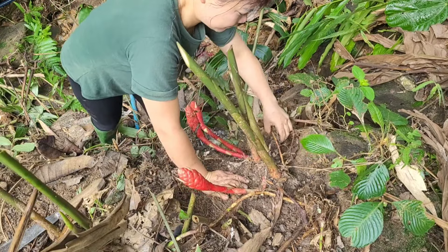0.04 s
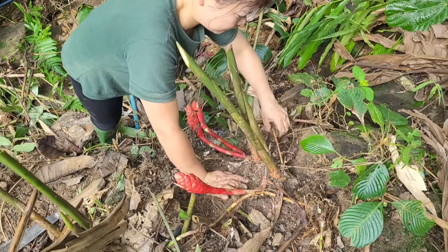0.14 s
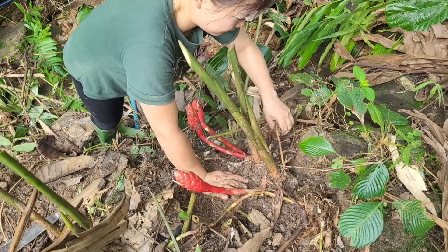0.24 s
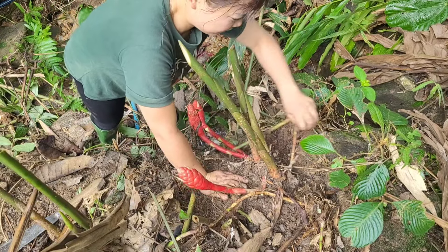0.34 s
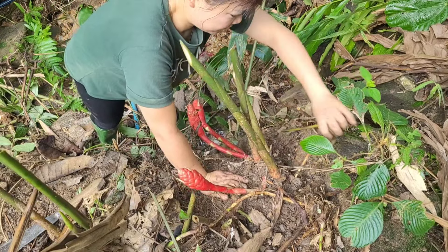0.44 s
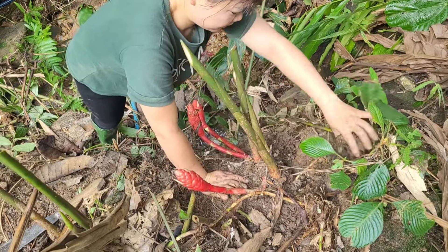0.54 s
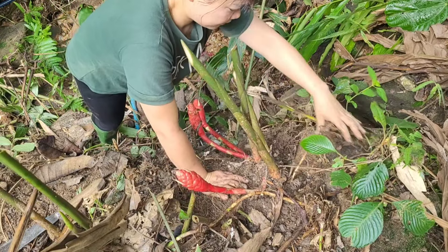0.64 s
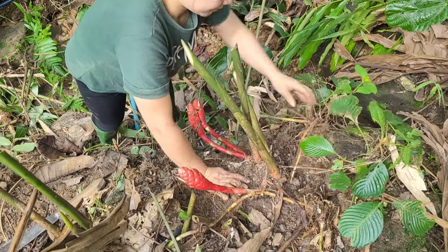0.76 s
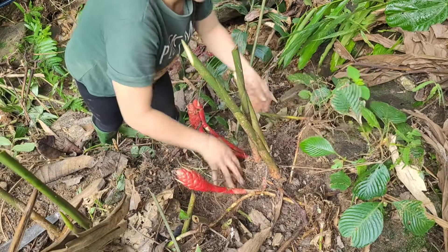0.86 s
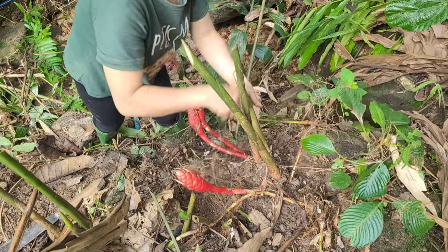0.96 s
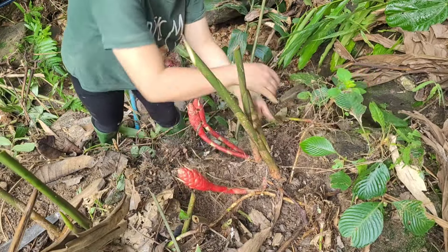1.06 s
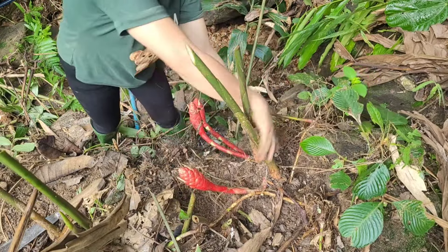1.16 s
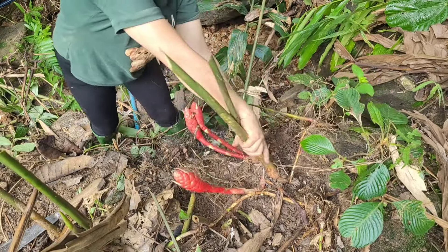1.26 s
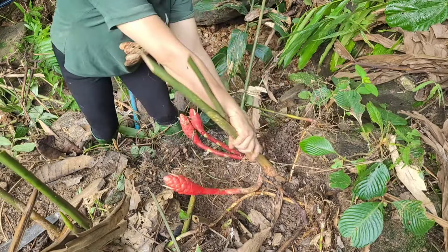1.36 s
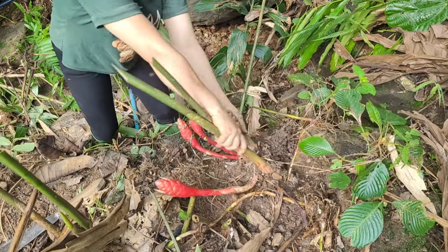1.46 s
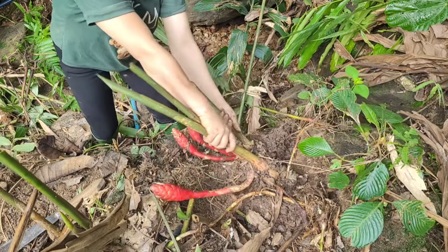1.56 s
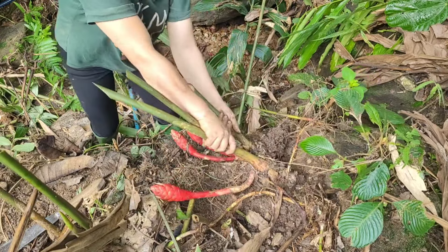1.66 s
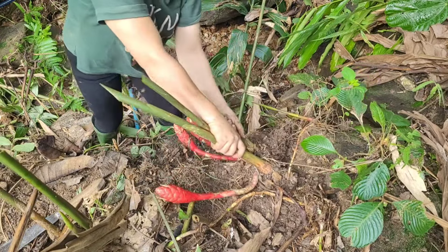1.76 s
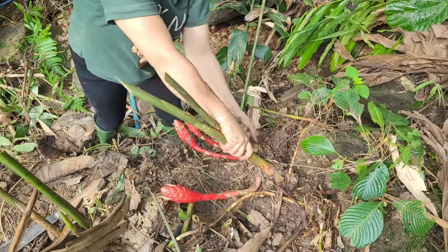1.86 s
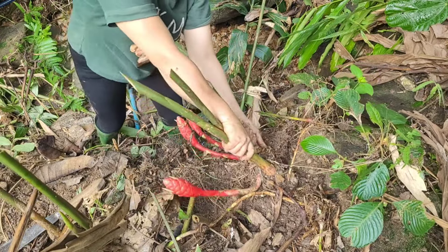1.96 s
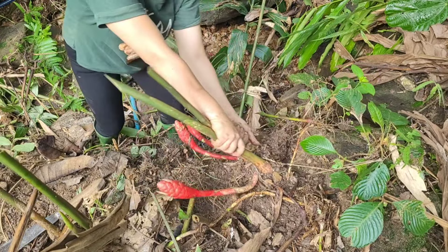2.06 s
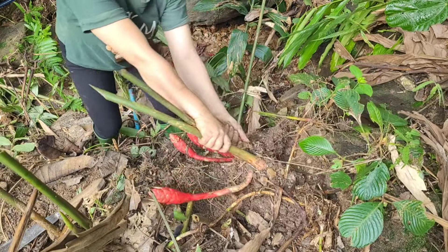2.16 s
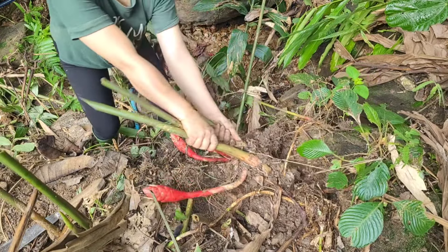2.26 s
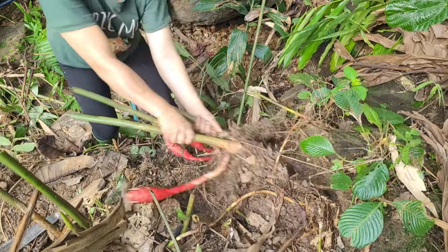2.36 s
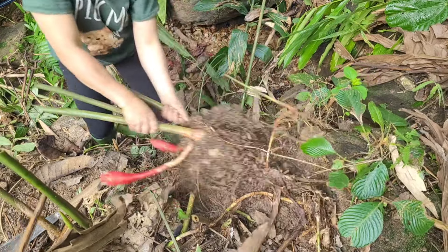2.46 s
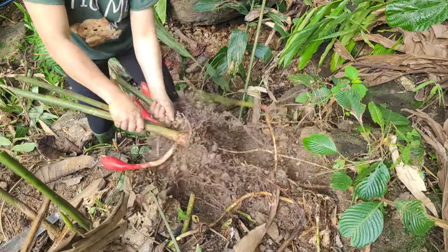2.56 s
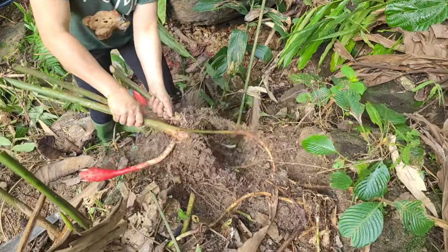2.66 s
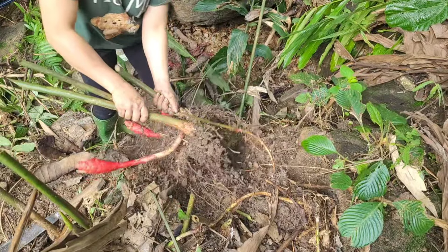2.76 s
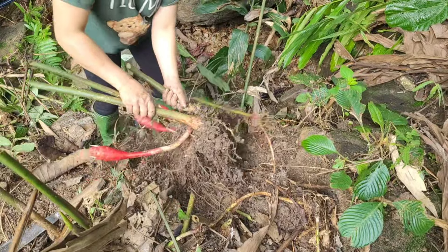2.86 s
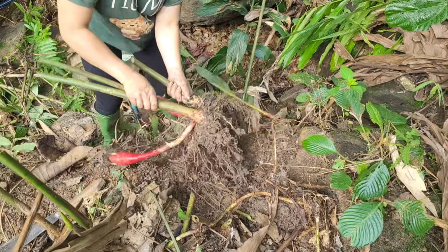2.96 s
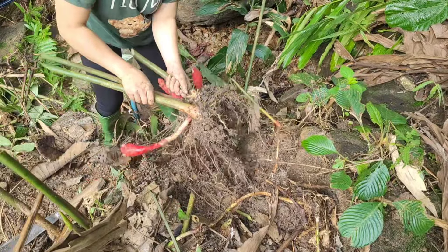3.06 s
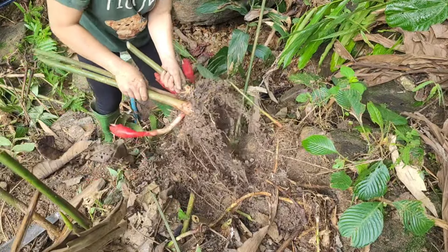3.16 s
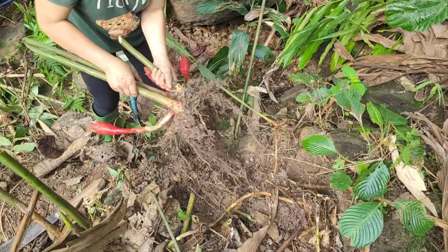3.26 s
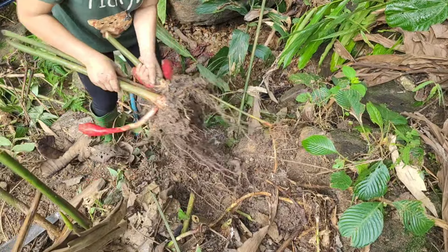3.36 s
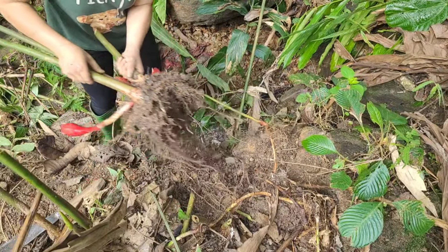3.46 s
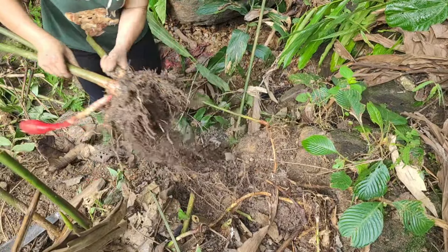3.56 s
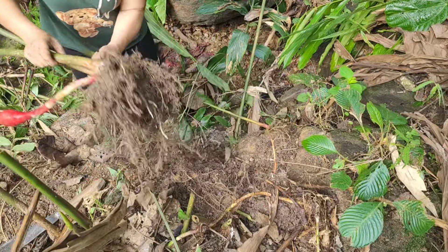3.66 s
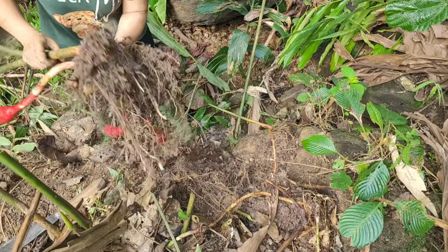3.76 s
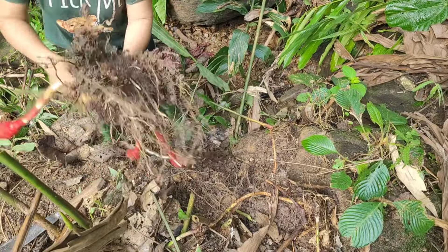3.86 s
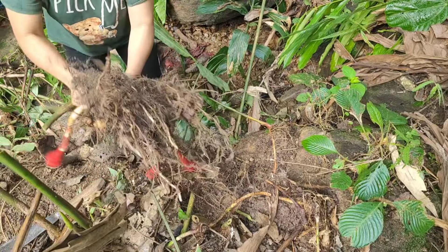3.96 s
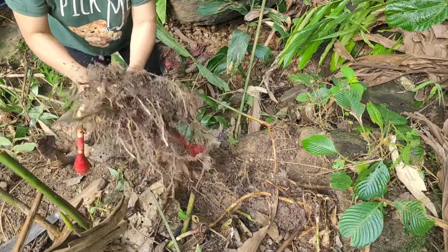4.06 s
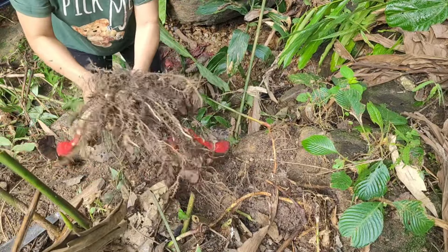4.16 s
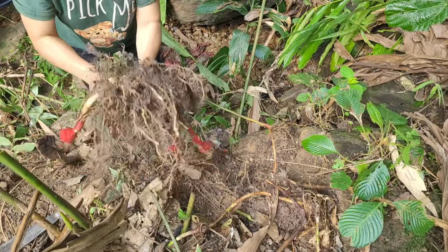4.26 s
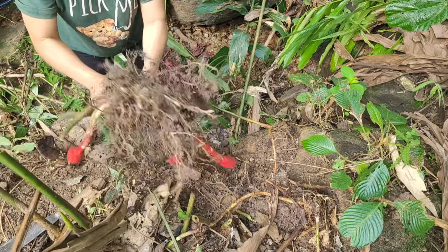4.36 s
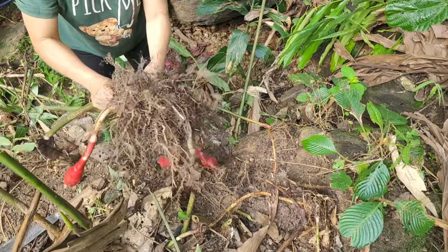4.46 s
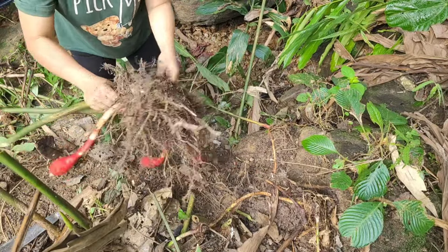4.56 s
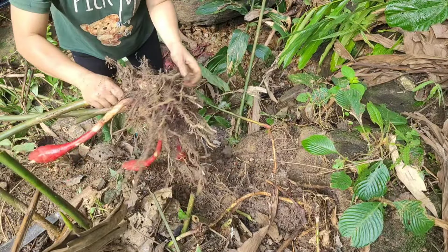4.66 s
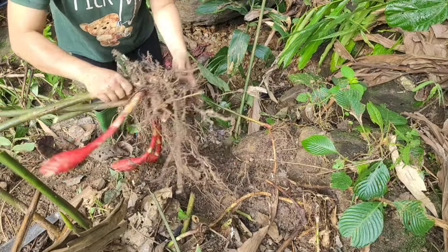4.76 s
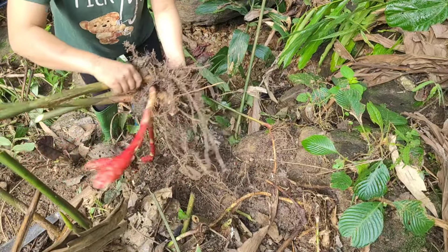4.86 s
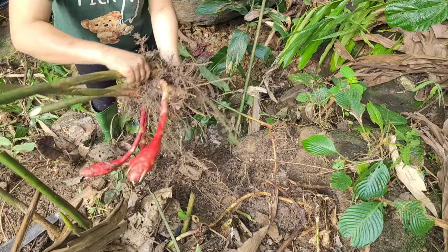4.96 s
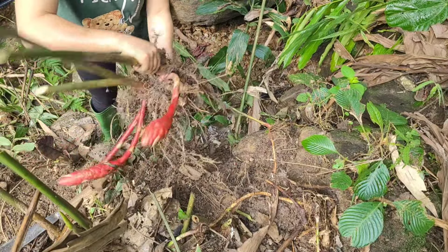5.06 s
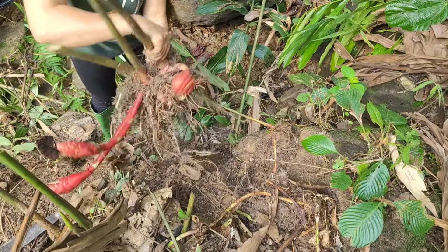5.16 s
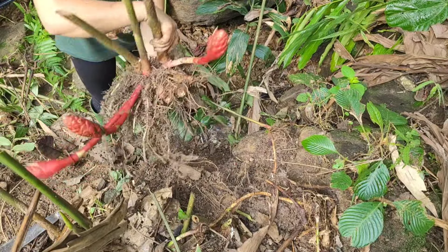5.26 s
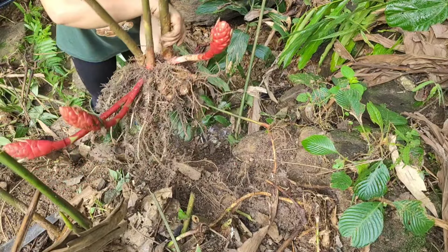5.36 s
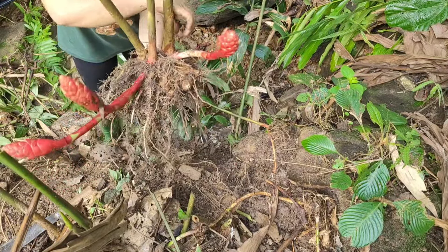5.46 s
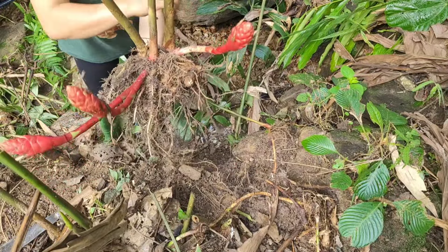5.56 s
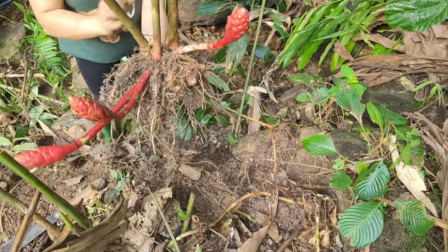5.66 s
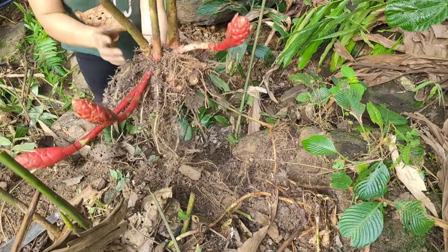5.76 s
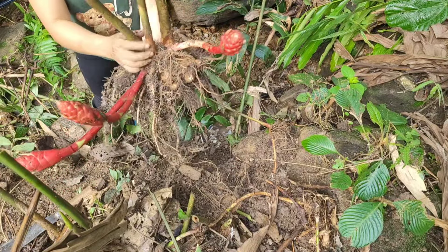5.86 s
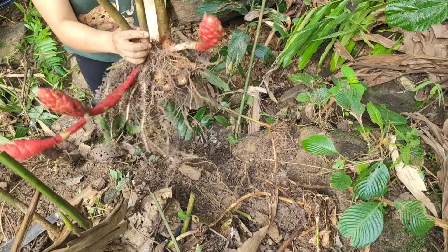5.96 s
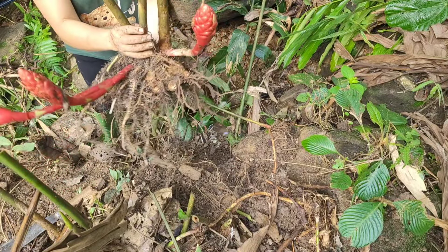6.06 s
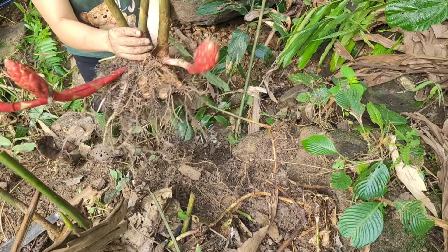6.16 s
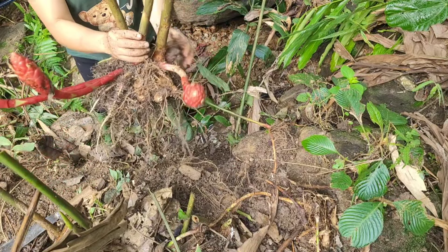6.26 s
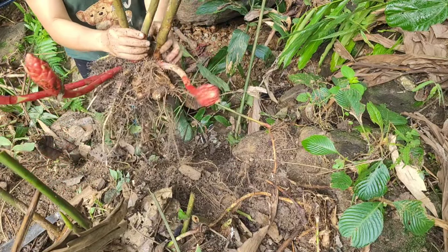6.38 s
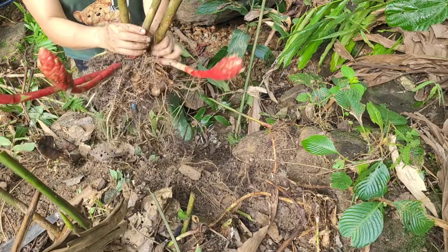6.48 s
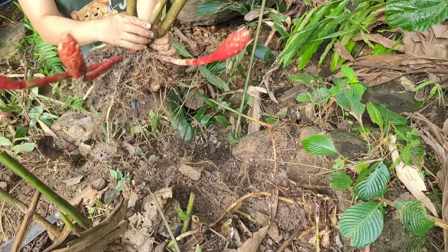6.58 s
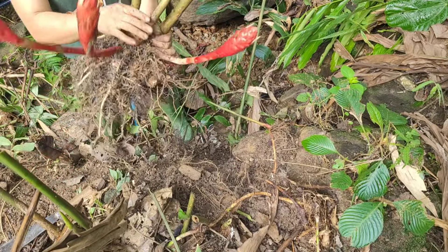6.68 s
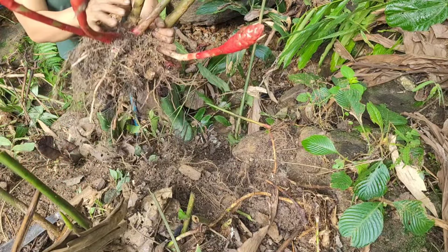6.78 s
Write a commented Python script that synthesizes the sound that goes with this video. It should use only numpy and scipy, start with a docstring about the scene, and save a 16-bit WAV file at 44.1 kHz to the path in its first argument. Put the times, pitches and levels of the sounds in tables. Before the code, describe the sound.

Leaf litter rustles under a searching hand, with dull little pops from the soil. After a quieter strained pull come a flurry of root cracks, a short woody creak and the loudest rush of tearing earth. Clods thud, crumbs tap leaves and grit hisses as the clump is shaken and turned, then only light dribbling remains. Near, dry outdoor sound, thin insect hiss all round.

```python
"""A hand scuffs through leaf litter over a thin insect hiss, then a clump of fleshy plants is pulled up.
Soil is a flow of random grains: clods thud, crumbs tap dry leaves and grit hisses as it is torn and shaken out.
Roots pop as muffled swings underground or snap as swept pulses through two bending modes; stems creak as
stick-slip tones. Rustling crunches and stray crumbs fill in, the forest scatters a dull tail, and filtered
noise from all round makes the insects and foliage."""
import sys
import numpy as np
from scipy import signal
from scipy.fft import rfft, irfft
from scipy.io import wavfile
from scipy.ndimage import uniform_filter1d

SR = 44100
rng = np.random.default_rng(int(sys.argv[2]) if len(sys.argv) > 2 else 0)


def dump(signal):
    """Clip the signal to [-1, 1] and save it as 16-bit WAV at the path in sys.argv[1]."""
    limited = np.clip(np.atleast_2d(signal).T, -1, 1)
    pcm = np.round(limited * 32767).astype(np.int16)
    wavfile.write(sys.argv[1], SR, pcm)


N = 300762
TIME = np.arange(N) / SR

# Levels are at the source, before panning, scattering and colouring.
# Each disturbance sets soil running; it builds (over 2 ms or more), holds and trickles out. In order:
# a hand sweeps the litter, is drawn back, gropes for a grip; soil sifts under the steady pull, the ground
# starts to lift, roots part, the root ball tears out, its soil lands; it is lifted clear, shaken,
# turned over, held up still dribbling, and tilted again.
# [t/s, level/dB, rise/s, hold/s, fade time constant/s, clods relative to crumbs level/dB]
SOIL_POURS = [(0, -53, 0.0016, .11, 0.1, -2.5), (0.186, -57, 0.013, 0.08, 0.5, -13.5),
              (0.54, -63, 0.18, 0.64, 0.38, -3), (1.61, -69, 0.013, 0.95, .2, -9),
              (2.187, -60, 0.067, 0.024, 0.16, -0.5), (2.383, -52.5, 0.0083, 0.037, 0.36, -6.5),
              (2.69, -45, 0.089, 0.096, 0.18, -7), (2.919, -41.5, 0.015, 0.036, 0.2, -4),
              (3.149, -51.5, 0.028, 0.23, 1, -7), (4.155, -51, 0.26, 0.15, 0.74, -8.5),
              (5.13, -60, 0.1, 0.13, .02, -3), (5.396, -66.5, 0.053, 0.29, 0.29, -14),
              (6.404, -59.5, 0.33, .1, 0.4, -14)]
# roots snapping in the open: [t/s, stump level/dB, stump f/Hz, crack level/dB, crack f/Hz,
# top of the crack f/Hz, splinter tail level/dB]
ROOT_SNAPS = [(1.6444, -35, 745, -24.5, 4760, 6050, -31), (1.6528, -28.5, 800, -38, 1610, 6900, -47),
              (2.371, -21, 560, -24.5, 1560, 4540, -32), (2.4006, -20.5, 318, -26.5, 1700, 8000, -34.5),
              (2.4093, -20, 583, -23.5, 1870, 7800, -24.5), (2.475, -31.5, 333, -18.5, 2100, 8150, -31),
              (2.9245, -40, 600, -31, 2300, 7000, -40), (3.1502, -36, 383, -31.5, 1910, 6000, -39)]
# roots giving way underground and clods landing: [t/s, level/dB, f/Hz]
MUFFLED_KNOCKS = [(.567, -38.5, 527), (.581, -36, 840), (.879, -38.5, 885), (.901, -46, 487),
                  (.966, -43, 437), (.998, -39.5, 654), (1.017, -42.5, 450), (1.157, -39.5, 714),
                  (1.169, -29.5, 530), (1.179, -40, 340), (1.193, -47, 380), (1.215, -45, 700),
                  (1.273, -40, 554), (2.029, -32, 620), (2.037, -43, 520), (3.255, -42.5, 480),
                  (3.41, -37, 605), (3.822, -40.5, 740), (4.508, -34, 635), (5.062, -38, 700),
                  (5.072, -45, 600), (5.182, -40.5, 415), (5.193, -45, 450), (5.619, -48, 430),
                  (5.634, -55, 450), (5.658, -50.5, 400)]
# fine rootlets and dry leaf edges cracking: [t/s, level/dB, f/Hz]
FIBRE_TICKS = [(.6695, -32, 3430), (.7975, -33, 2400), (.8307, -29.5, 7340), (1.3169, -30, 4600),
               (2.0313, -32, 6380), (2.2852, -33.5, 3430), (2.3423, -32, 3500), (2.3935, -23.5, 7250),
               (2.4178, -18, 4740), (2.4202, -24, 4240), (2.4508, -37, 8000), (2.633, -37, 6000),
               (2.741, -32, 9000), (2.801, -26.5, 7500), (2.912, -24, 9000), (2.937, -26, 6170),
               (3.003, -22.5, 2700), (3.0725, -21, 6940), (3.0775, -26, 8400), (3.6134, -27, 7950),
               (3.875, -31, 8500), (4.2297, -25, 6600), (4.4645, -32, 8000), (4.7255, -31, 4580),
               (4.9205, -35, 3000), (4.9605, -31, 9050), (5.9225, -39, 7000), (6.146, -42, 7000),
               (6.6672, -33.5, 6450)]
# larger crumbs tapping on dry leaves: [t/s, level/dB, f/Hz]
LEAF_TAPS = [(2.853, -30, 1700), (2.8852, -32, 2090), (3.0024, -30, 2730), (3.1485, -22.5, 2280),
             (3.4562, -35, 2340), (3.497, -34, 1900), (3.5231, -33.5, 1640), (3.683, -35, 1350),
             (3.7715, -36.5, 1540), (4.0329, -29.5, 1480), (4.618, -33, 1510), (4.6959, -32, 1150),
             (4.7715, -32, 2090), (4.8725, -34, 1750), (4.9205, -36, 1200), (5.0105, -35, 2240),
             (6.6665, -47, 1600), (6.807, -36, 2200)]
# handfuls of soil and litter crushed, torn or shed at once:
# [t/s, level/dB, length/s, centre f/Hz, resonance Q]
LITTER_CRUNCHES = [(0.061, -54.5, 0.06, 1700, 0.43), (0.235, -45.5, 0.056, 644, 0.4),
                   (0.548, -47, 0.026, 734, .4), (.68, -43.5, 0.017, 1230, 0.98),
                   (0.7955, -40, 0.01, 1700, 1), (0.865, -46.5, 0.018, 850, 0.8),
                   (0.948, -47.5, 0.03, 980, 0.81), (1.137, -46, 0.025, 4500, .5),
                   (1.157, -45, .006, 1500, 1.5), (1.25, -46, 0.013, 1290, 0.54),
                   (1.318, -43, 0.022, 850, 0.48), (2.4, -38, 0.02, 258, 0.74),
                   (2.412, -37, 0.01, 1500, 0.82), (2.417, -42, 0.096, 6100, 0.33),
                   (2.623, -52.5, 0.028, 650, 1), (2.643, -46, 0.025, 516, .8),
                   (2.659, -41.5, 0.041, 1300, 0.33), (2.703, -49, 0.0095, 600, .7),
                   (2.755, -35, 0.016, 7040, 0.87), (2.854, -33, 0.007, 1510, 0.51),
                   (2.885, -37, .006, 1900, 1), (2.921, -30, 0.0079, 1700, 1.1),
                   (2.937, -35, .016, 5500, .35), (2.948, -35, 0.014, 1400, 0.76),
                   (3.003, -29, 0.0068, 2700, 0.26), (3.057, -29.5, 0.011, 1960, 0.56),
                   (3.077, -34.5, 0.023, 7500, 0.45), (3.135, -43, 0.016, 1500, 1),
                   (3.148, -31.5, 0.013, 1900, 0.93), (3.21, -48, 0.021, 1400, 1.1),
                   (3.276, -46, .025, 1500, 0.81), (3.419, -37.5, 0.012, 2500, 0.69),
                   (3.577, -42, 0.015, 1400, 0.35), (3.765, -50, 0.027, 1410, 0.52),
                   (3.841, -50, 0.013, 600, 0.53), (3.911, -48.5, .012, 900, .5),
                   (3.951, -43, 0.03, 1570, 0.34), (4.197, -41.5, 0.017, 1500, 0.46),
                   (4.22, -40.5, 0.071, 7960, .45), (4.242, -41.5, 0.031, 1300, 0.4),
                   (4.462, -38.5, 0.024, 9200, .45), (4.585, -39, 0.018, 1300, 0.64),
                   (4.65, -37, .015, 2580, 0.38), (4.724, -39.5, 0.012, 5030, 0.4),
                   (4.381, -55.5, 0.067, 249, 1.3), (4.696, -53.5, 0.07, 233, 2.2),
                   (4.752, -52, .012, 850, 0.83), (4.775, -45, .014, 2200, 1.5),
                   (4.88, -48, 0.04, 1700, .9), (5.015, -52, .03, 2400, 2), (5.082, -64, 0.1, 231, 1.4),
                   (5.236, -53, .012, 1200, 0.45), (5.258, -48, 0.009, 850, 0.49),
                   (5.301, -50.5, .012, 800, 0.43), (5.336, -49.5, .014, 1300, 0.41),
                   (5.62, -56, .007, 1300, .6), (5.654, -50, 0.016, 1900, .5), (5.701, -57, 0.013, 650, .9),
                   (6.224, -63.5, 0.02, 600, 0.67), (6.438, -59.5, 0.028, 930, .6),
                   (6.743, -62, 0.05, 220, 1.2)]
# two creaks: stems under the pull, then twisting as the root ball swings free: [t/s, slip f/Hz, level/dB]
STEM_CREAKS = [
    [(1.4, 425, -78), (1.425, 455, -68), (1.455, 425, -68), (1.48, 462, -70), (1.51, 430, -75),
     (1.56, 430, -79)],
    [(2.78, 480, -54), (2.793, 420, -40), (2.802, 395, -38), (2.807, 370, -27), (2.812, 340, -32),
     (2.817, 260, -37.5), (2.83, 232, -37), (2.849, 238, -37), (2.866, 235, -54)],
]
# the ground shudders under a shift of weight: [t/s, level/dB]
GROUND_SHUDDERS = [(0.249, -69), (1.31, -67), (1.652, -68), (2.402, -46), (2.8, -62), (3.14, -66),
                   (4.25, -66)]
# spectrum of the hissing grit: [f/Hz, level/dB]
GRIT_SPECTRUM = [(1500, -9.5), (3000, 1.5), (4500, 3.5), (6300, 0), (7500, 3), (8800, -3.5), (12000, -1),
                 (15500, -4.5)]
# spectrum of a root crack and its splinters: [f/Hz, level/dB]
CRACK_SPECTRUM = [(150, -7), (500, -2.5), (1400, 7.5), (2800, 1), (4200, 2), (5300, 5.5), (6600, 2),
                  (8000, 2.5), (10000, 4.5), (15500, -8)]
# the leaf-covered ground favours some bands and swallows others: [f/Hz, level/dB]
GROUND_COLOUR = [(100, -3), (147, 2.5), (190, -2), (235, 2), (290, 0.5), (345, 2.5), (450, 1.5), (600, 3),
                 (950, -2), (1500, 0.5), (2600, -1), (3600, -2), (15500, 0.3)]
# spectrum of far insects and foliage: [f/Hz, level/dB]
FOREST_SPECTRUM = [(30, -14), (60, -6.5), (120, -11), (400, -15.5), (1100, -5.5), (2000, -4), (2600, 0),
                   (4000, -2), (5500, 2), (6400, -5.5), (7300, 5), (8500, -3.5), (11000, -7), (15500, -14)]
# the two ports differ in colour: [f/Hz, left minus right level/dB]
PORT_COLOUR = [(1000, 0), (2800, -.5), (5500, -1.5), (7500, -3.5), (9500, 2.1), (15500, -0.5)]

# layers relative to the flow; crackle is brittle leaf fragments breaking under the soil
CLOD_DB, CRUMB_DB, CRACKLE_DB, GRIT_DB = -2, 1.5, -3, 6.5
# share of the grit's fade time; a smaller share makes a layer settle sooner
CLOD_FADE_SHARE, CRUMB_FADE_SHARE = 0.69, 0.92
DENSE_DB, SPARSEST_SHARE = -47, .16  # below this flow the particles thin out, down to this share of their rate
SPURT_DB, SPURT_HZ = 1.32, 44.8  # unevenness of the flow
LOOSE_SIZE_DB, LOOSE_PITCH_OCT = 4.8, 0.4  # spread of the loose pieces
LOOSE_LIMIT_DB = -52  # a stronger flow brings no bigger pieces
SETTLING_DB = -58.5  # bent litter keeps ticking as if at least this much soil ran
ROOT_Q, ROOT_OVERTONE = 4, 2.76  # a root is a damped bar: sharpness and ratio of its first two bending modes


def flow():
    """Amplitude of the running grit, crumbs and clods; overlapping pours add in power."""
    power = np.full((3, N), 1e-12)
    for s, db, rise, hold, fade, clod_db in SOIL_POURS:
        built = undb(db) * np.clip((TIME - s) / max(rise, .002), 0, 1)
        spent = np.clip((TIME - s - rise - hold) / fade, 0, 20)
        grit = built * np.exp(-spent)
        crumbs = built * np.exp(-spent / CRUMB_FADE_SHARE)
        clods = built * np.exp(-spent / CLOD_FADE_SHARE) * undb(clod_db)
        power += np.array([grit, crumbs, clods]) ** 2
    return np.sqrt(power)


def spill(fine, middle, coarse):
    """Soil comes off in spurts: clods thud, crumbs tap and crack leaves, grit hisses; a weak flow thins to grains."""
    density = np.clip(middle / undb(DENSE_DB), SPARSEST_SHARE, 1)

    clods = patter(231, 714, rate=750, spread_db=3.0, q=3.2, tilt_db=2.5, count=6)
    clods = unit(band(clods, 84, 1600, order=2))

    crumbs = patter(754, 2990, rate=1900, spread_db=2.5, q=5.5, tilt_db=1.2, count=14, density=density)
    crumbs = unit(band(crumbs, 450, 3400, order=2)) * pan(-1.6)

    fragments = grains(N, rate=420, spread_db=2.6, density=density)
    crackle = unit(band(ring(fragments, 2200, q=0.47), 860, 8000))

    grit = grains(N, rate=17000, spread_db=1.5, density=density)
    grit = unit(colour(grit, GRIT_SPECTRUM)) * pan(1.5)

    soil = coarse * clods * undb(CLOD_DB)
    soil = soil + middle * (crumbs * undb(CRUMB_DB) + crackle * undb(CRACKLE_DB))
    soil = soil + fine * grit * undb(GRIT_DB)
    return soil * undb(SPURT_DB * walk(SPURT_HZ))


def patter(lo_hz, hi_hz, rate, spread_db, q, tilt_db, count=7, density=None):
    """Particles land on many leaves and lumps, each ringing briefly at its own pitch; tilt is per octave."""
    out = 0
    for hz in np.geomspace(lo_hz, hi_hz, count):
        impacts = grains(N, rate / count, spread_db, density=density)
        out = out + undb(tilt_db * np.log2(hz / lo_hz)) * unit(ring(impacts, hz, q))
    return out


def grains(n, rate, spread_db, lead_s=.00013, width_s=.00012, density=None):
    """Random tiny impacts of uneven size, thinned where density is under 1, each with its own lag between ports."""
    generator = np.random.default_rng(rng.integers(2 ** 31))
    chance = generator.random((max(int(rate * n / SR), 1), 6))
    when, size, sign, u, v, luck = chance.T
    size = undb(-spread_db * np.log(np.maximum(size, .01))) * np.sign(sign - .5)
    if density is not None:
        share = density[(when * n).astype(int)]
        size = size * (luck < share) / np.sqrt(share)  # fewer but larger grains hold the power
    lag = (lead_s + width_s * np.sqrt(6) * (u - v)) * SR
    ports = [np.bincount((when * n + side * lag).astype(int) % n, size, n) for side in (-.5, .5)]
    return unit(np.array(ports))


def loose(running, rate, over_db, hz):
    """Random pieces per second, bigger while more soil runs: rows of t/s, level/dB, f/Hz."""
    count = int(rate * N / SR)
    timing, build = (np.random.default_rng(seed) for seed in rng.integers(2 ** 31, size=2))
    at = (timing.random(count) * N).astype(int)
    size, pitch = np.clip(build.standard_normal((count, 2)), -2, 2).T
    flow_db = np.minimum(20 * np.log10(running[at]), LOOSE_LIMIT_DB)
    db = flow_db + over_db + LOOSE_SIZE_DB * size
    return list(zip(at / SR, db, hz * 2 ** (LOOSE_PITCH_OCT * pitch)))


def snaps(lag_s=0.001553, lag_hz=3500, splinter_s=0.0042, stump_cycles=0.98):
    """A root parts with one sharp pulse; its stump jolts the soil and splinters follow."""
    out, t = np.zeros((2, N)), TIME[:SR // 6]
    # bending waves run faster in the treble, so the pulse leaves the root as a very quick downward sweep
    hz = np.fft.rfftfreq(len(t), 1 / SR)
    sweep = irfft(np.exp(-2j * np.pi * lag_s * lag_hz * np.log1p(hz / lag_hz)), len(t))
    pulse = colour(sweep[None] * np.exp(-t / splinter_s), CRACK_SPECTRUM)
    for s, stump_db, stump_hz, crack_db, crack_hz, top_hz, tail_db in ROOT_SNAPS:
        stump = np.sin(2 * np.pi * stump_hz * t) * np.exp(-stump_hz * t / stump_cycles)
        stump = band(stump, 180, 5700, order=2)
        crack = unit_energy(root(pulse, crack_hz, top_hz))
        splinters = grains(len(t), rate=1700, spread_db=2.0, lead_s=.00001, width_s=.00008)
        splinters = root(colour(splinters, CRACK_SPECTRUM), crack_hz, top_hz)
        splinters = unit(splinters) * np.exp(-t / splinter_s)
        add(out, s, undb(crack_db) * crack)
        add(out, s + .0005, undb(stump_db) * stump + undb(tail_db) * splinters)
    return out


def root(x, hz, top_hz):
    """A broken root rings in two bending modes and passes little above its top."""
    x = x + undb(3.0) * ring(x, hz, ROOT_Q) + undb(-5.0) * ring(x, ROOT_OVERTONE * hz, ROOT_Q)
    return band(x, 105, top_hz, order=4) + undb(-18) * x


def knocks(rows, t60_s=0.0078):
    """Soil muffles each pop to a few quickly damped swings; a few crumbs settle after it."""
    out, t = np.zeros((2, N)), TIME[:SR // 10]
    for s, db, hz in rows:
        envelope = (1 - np.exp(-t / 0.00017)) * undb(-60 * t / t60_s)
        swing = band(np.sin(2 * np.pi * hz * t) * envelope, 310, 3000, order=2)
        settling = ring(grains(len(t), rate=2700, spread_db=-11.0), 1.17 * hz, q=2.3)
        settling = unit(settling) * np.exp(-t / 0.0093)
        knock = swing / np.abs(swing).max() + undb(-16.0) * settling
        add(out, s + 0.00192, undb(db) * knock)
    return out


def ticks(rows):
    """A thin dry fibre breaks in a noise burst about a millisecond long."""
    out, t = np.zeros((2, N)), TIME[:SR // 50]
    for s, db, hz in rows:
        burst = diffuse(len(t), 4800) * (t / .0003) * np.exp(-t / 0.00046)
        tick = band(ring(burst, hz, q=1.5), 900, 18000)
        add(out, s + .0006, undb(db - 5.5) * unit_energy(tick))
    return out


def taps(rows, click_db=-13, shatter_db=-8, shatter_s=0.0074):
    """A crumb clicks on a dry leaf, which rings for a few cycles, and falls apart into skittering grains."""
    out, t = np.zeros((2, N)), TIME[:SR // 25]
    for s, db, hz in rows:
        contact = diffuse(len(t), 3300) * np.exp(-t / 0.0011)
        shatter = grains(len(t), rate=1600, spread_db=5.5) * np.exp(-t / shatter_s)
        contact = contact + undb(shatter_db) * shatter
        leaf = ring(contact, hz, q=5.1) + undb(click_db) * band(contact, 500, 5600)
        add(out, s + 0.001976, undb(db - 2.0) * unit_energy(leaf))
    return out


def crunches():
    """A short avalanche of grains builds quickly and dies away, ringing the leaves and lumps that it meets."""
    out, t = np.zeros((2, N)), TIME[:SR // 4]
    for s, db, length, hz, q in LITTER_CRUNCHES:
        age = t / (max(length, .004) / 2)
        swell = np.sqrt(2 * age) * np.exp(.5 - age)  # peaks at 1
        crush = ring(grains(len(t), rate=3200, spread_db=1.5), hz, q)
        crush = band(crush, 110, 22000, order=2)
        add(out, s, undb(db) * swell * unit(crush))
    return out


def creaks(rough_db=-18, waver_db=2.5):
    """The fleshy stems stick and slip at a gliding rate with uneven grip; fibres rasp at every slip."""
    out = 0
    for rows, jitter in zip(STEM_CREAKS, (.09, .03)):  # jitter as a share of the slip rate
        s, hz, db = np.transpose(rows)
        slip_hz = np.interp(TIME, s, hz) * (1 + jitter * walk(200))
        phase = 2 * np.pi * np.cumsum(slip_hz) / SR
        tone = np.sin(phase) + undb(-16.0) * np.sin(2 * phase) + undb(-25) * np.sin(3 * phase)
        rasp = rng.standard_normal(N) * (1 + np.sin(phase))
        rasp = unit(band(rasp, 320, 650, order=3))
        level = undb(np.interp(TIME, s, db) + waver_db * walk(70))
        sounding = (TIME > s[0]) * (TIME < s[-1])
        out = out + (tone + undb(rough_db) * rasp) * level * sounding
    return out


def strays():
    """Lone crumbs keep dropping into the litter all through, ringing as they land."""
    crumbs = patter(900, 2800, rate=260, spread_db=1.5, q=5, tilt_db=1.5, count=9)
    return undb(-70.0) * unit(crumbs)


def shudders(hz=58, decay_s=0.061):
    """The soft ground bounces for a few cycles, with a rough rumble."""
    out, t = np.zeros((2, N)), TIME[:SR // 2]
    for s, db in GROUND_SHUDDERS:
        rough = unit(band(diffuse(len(t), 120), 35, 130, order=2))
        rumble = np.sin(2 * np.pi * hz * t) + undb(-5) * rough
        envelope = (1 - np.exp(-t / 0.0054)) * np.exp(-t / decay_s)
        add(out, s, undb(db - 1.0) * rumble * envelope)
    return out


def scatter(x, db, t60):
    """Leaves and trunks return a weak, dull tail."""
    t = TIME[:SR // 2]
    echo = band(diffuse(len(t), 690), 130, 15300) * undb(-60 * t / t60) * (t > .003)
    return undb(db) * signal.fftconvolve(x, unit(echo) / np.sqrt(len(t)), axes=1)[:, :N]


def forest(level_db=-54.5):
    """Far insects and foliage merge into an almost even, thin hiss."""
    hiss = unit(colour(diffuse(N, 150), FOREST_SPECTRUM))
    return hiss * undb(level_db + 0.5 * walk(6.5))


def diffuse(n, alike_hz):
    """Noise from all round: the same at both ports in the bass, unrelated in the treble."""
    mid, side = rng.standard_normal((2, n))
    side = signal.sosfilt(signal.butter(1, alike_hz, "high", fs=SR, output="sos"), side)
    return np.array([mid + side, mid - side]) / np.sqrt(2)


def walk(rate):
    """Random levels drawn rate times a second and joined by ramps; spread near 1."""
    k = int(SR / rate)
    steps = np.repeat(rng.standard_normal(N // k + 1), k)
    return 1.2 * uniform_filter1d(steps, k)[:N]


def undb(db):
    """Decibels to gain."""
    return 10 ** (np.asarray(db) / 20)


def unit(x):
    """Scale to rms 1."""
    return x / np.sqrt(np.mean(x ** 2) + 1e-20)


def unit_energy(x):
    """Scale a burst so that it has rms 1 when spread over a millisecond."""
    return x / np.sqrt(np.mean(np.sum(x ** 2, axis=-1)) / (SR / 1000))


def pan(left_db):
    """Gains of the two ports for a left-minus-right level."""
    return undb(np.array([[left_db], [-left_db]]) / 2)


def band(x, lo_hz, hi_hz, order=1):
    """Band-pass."""
    edges = [lo_hz, min(hi_hz, .47 * SR)]
    return signal.sosfilt(signal.butter(order, edges, "band", fs=SR, output="sos"), x + 1e-18)


def ring(x, hz, q):
    """One resonance."""
    b, a = signal.iirpeak(min(hz, .4 * SR), max(q, 3 * hz / SR), fs=SR)
    return signal.lfilter(b, a, x + 1e-18)


def response(points, size=2048):
    """Causal (minimum-phase) impulse response of a spectrum given as f/Hz, level/dB."""
    hz, db = np.transpose(points)
    bins = np.fft.rfftfreq(size, 1 / SR) + 1
    log_gain = np.log(undb(np.interp(np.log(bins), np.log(hz), db)))
    cepstrum = irfft(log_gain)
    cepstrum[1:size // 2] *= 2  # fold the cepstrum to positive time
    cepstrum[size // 2 + 1:] = 0
    return irfft(np.exp(rfft(cepstrum)))


def colour(x, points):
    """Give every channel a spectrum."""
    return signal.fftconvolve(x, response(points)[None])[:, :x.shape[1]]


def add(out, s, sound):
    """Mix a sound in at a time."""
    i = max(int(s * SR), 0)
    out[:, i:i + sound.shape[-1]] += sound[..., :max(N - i, 0)]


def scene():
    """Roots and pieces break a little to the right, amid running soil, with the forest all round."""
    fine, middle, coarse = flow()
    pieces = knocks(MUFFLED_KNOCKS + loose(coarse, rate=5.1, over_db=4, hz=580))
    pieces = pieces + taps(LEAF_TAPS + loose(middle, rate=24, over_db=5.5, hz=1820))
    settling = np.maximum(fine, undb(SETTLING_DB))
    pieces = pieces + ticks(FIBRE_TICKS + loose(settling, rate=30, over_db=7, hz=6000))
    plant = (pieces + snaps()) * pan(-0.71)

    near = spill(fine, middle, coarse) + strays() + crunches() + creaks()
    near = near + plant + scatter(plant, db=-10.0, t60=0.033)
    near = colour(near + scatter(near, db=-10.0, t60=0.12), GROUND_COLOUR)
    return near + shudders() * pan(-2.2) + forest() * pan(-0.58)


def record(dry):
    """Each port has its own colour; the recorder thins the deepest bass and cuts the top."""
    ports = []
    for port, side in zip(dry, (.5, -.5)):
        tint = [(hz, side * db) for hz, db in PORT_COLOUR]
        ports.append(colour(port[None], tint))
    dry = np.vstack(ports)
    dry = signal.sosfilt(signal.butter(2, 42, "high", fs=SR, output="sos"), dry)
    return signal.sosfilt(signal.ellip(10, .2, 70, 15650, fs=SR, output="sos"), dry)


dry = scene()
out = record(dry)
dump(out)
```